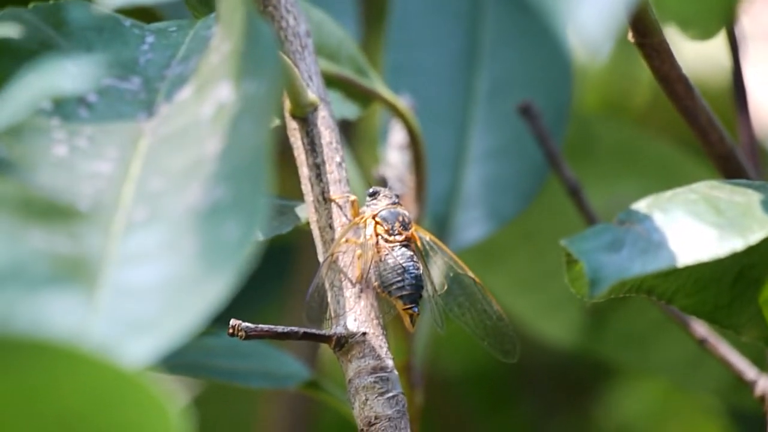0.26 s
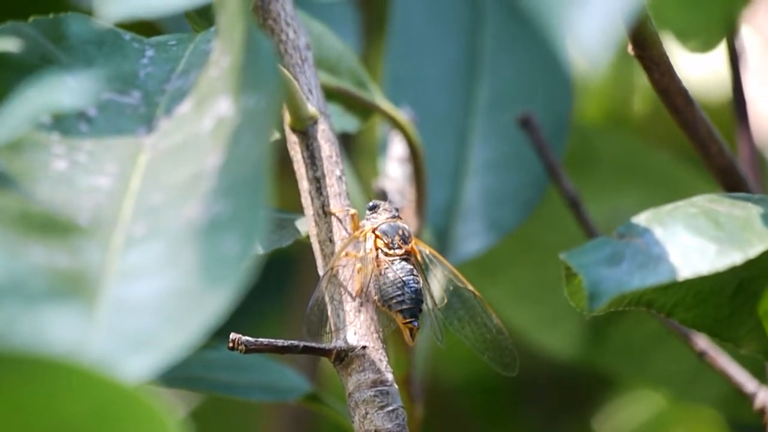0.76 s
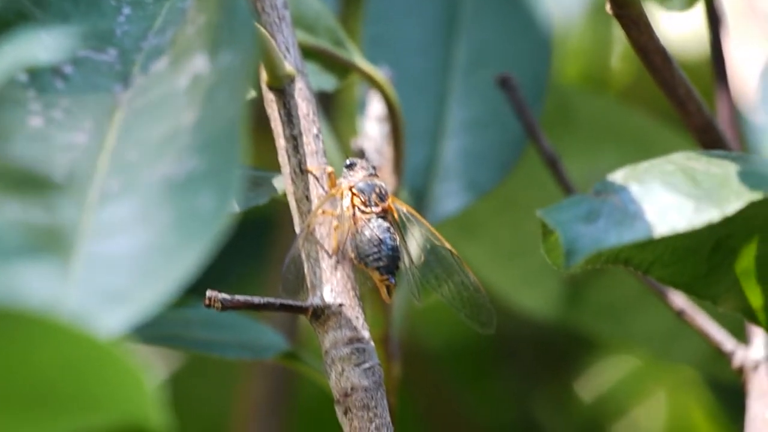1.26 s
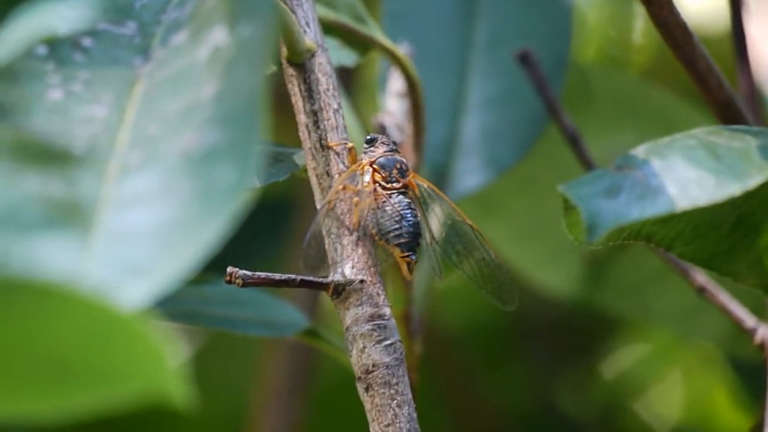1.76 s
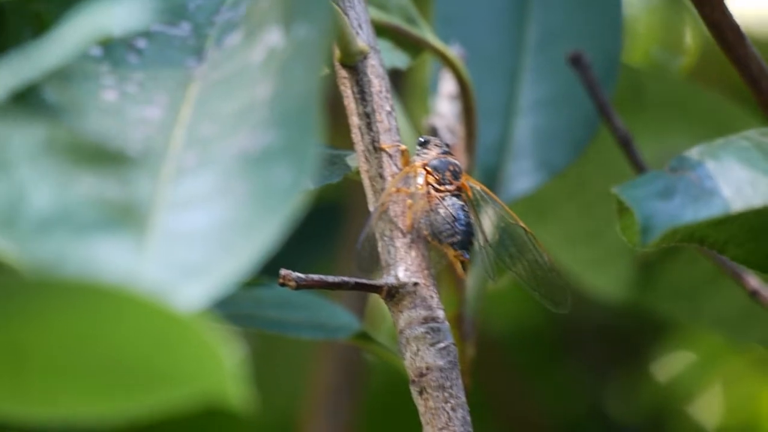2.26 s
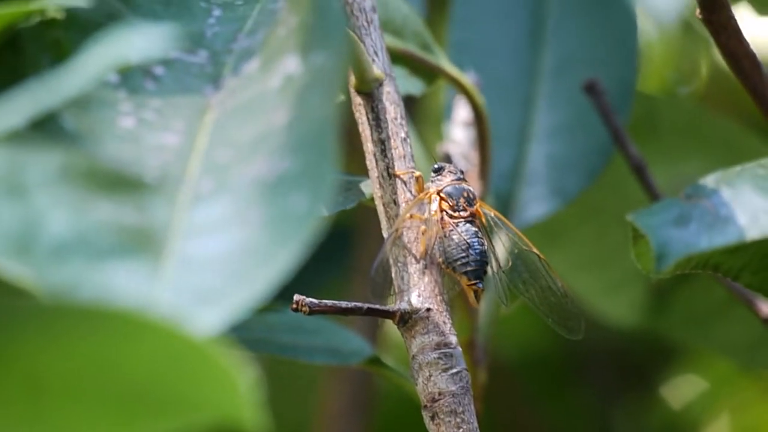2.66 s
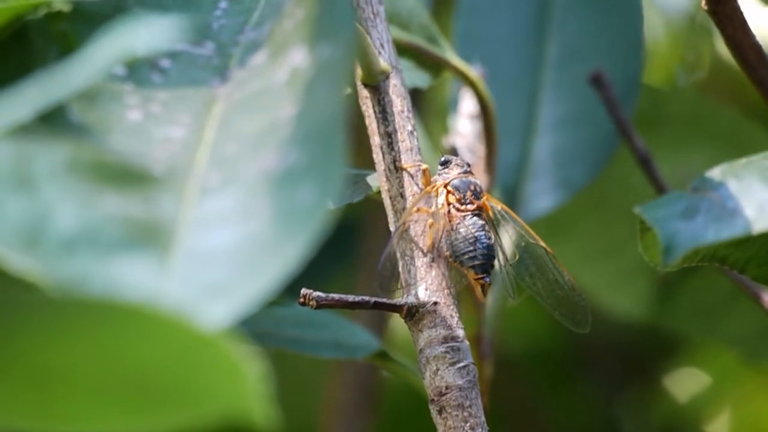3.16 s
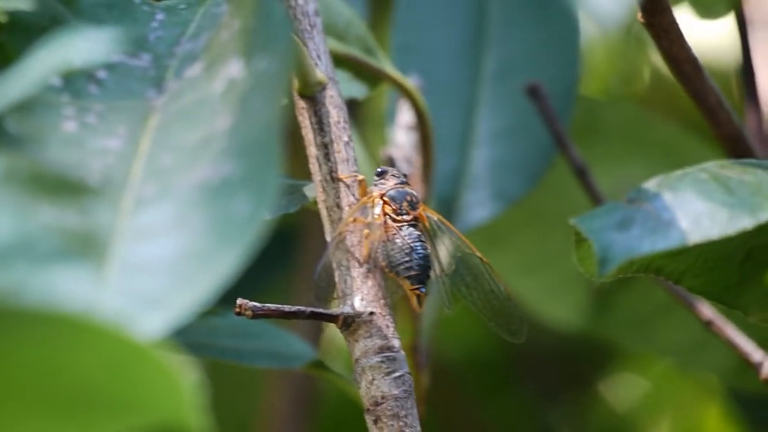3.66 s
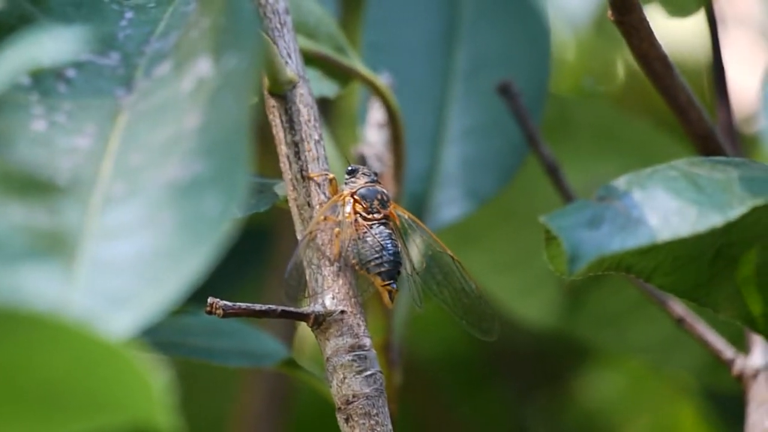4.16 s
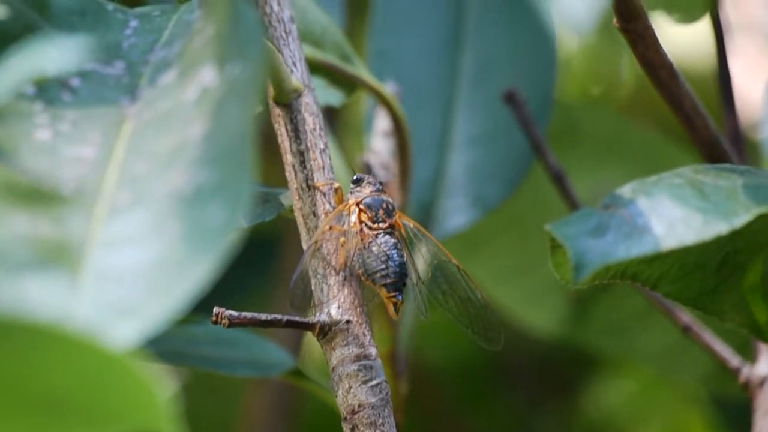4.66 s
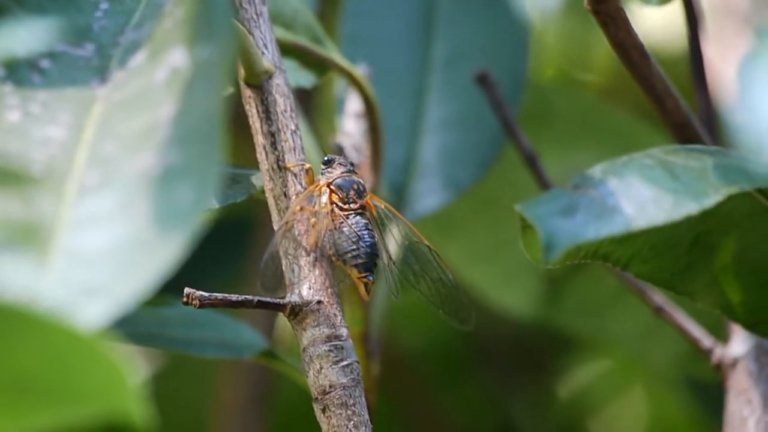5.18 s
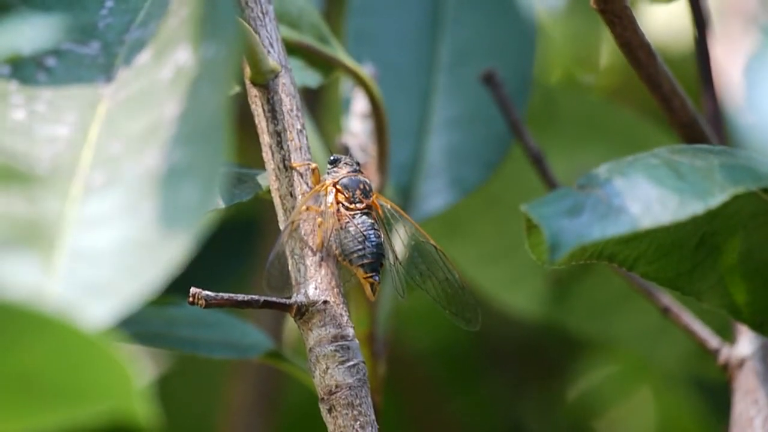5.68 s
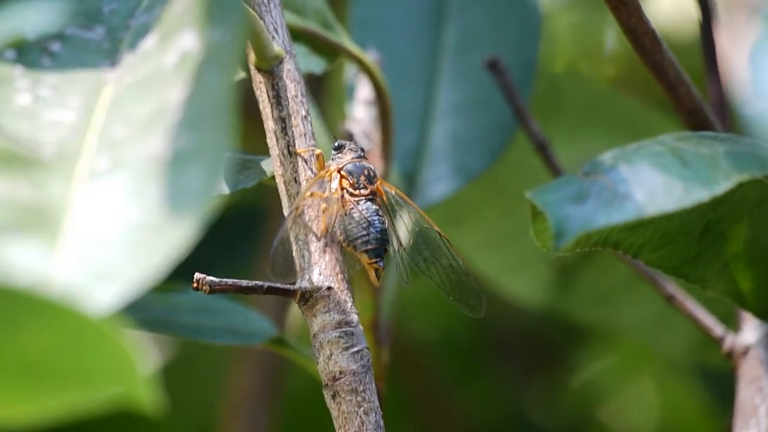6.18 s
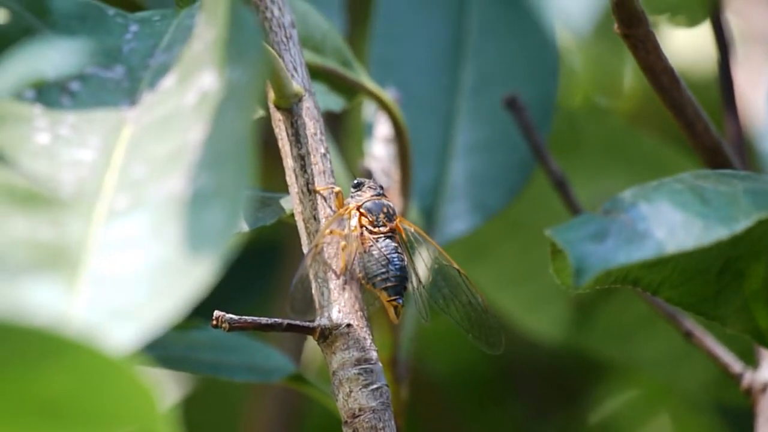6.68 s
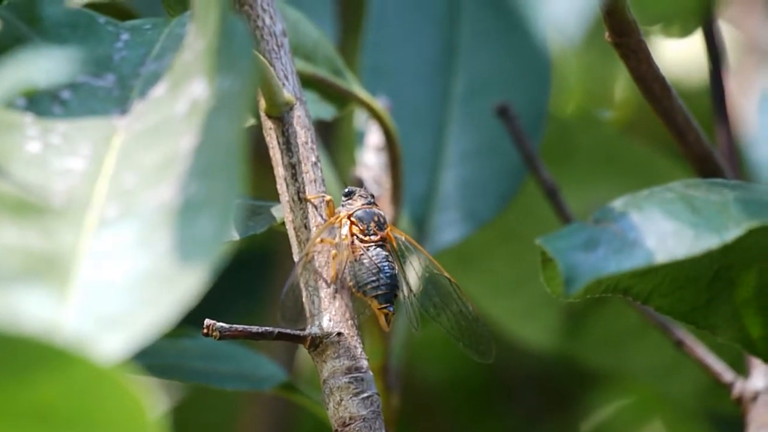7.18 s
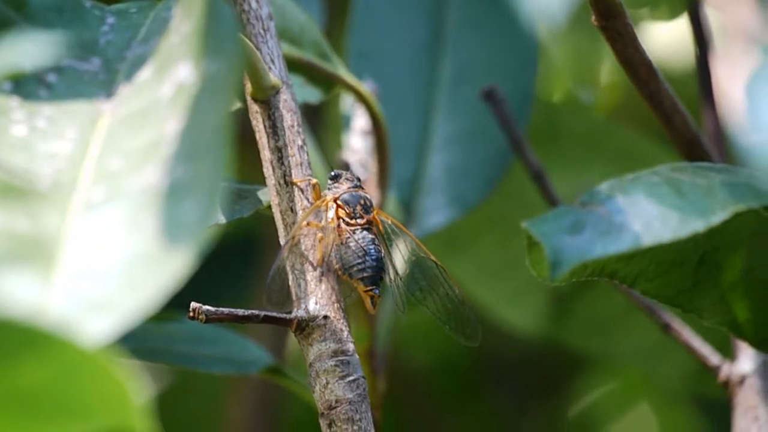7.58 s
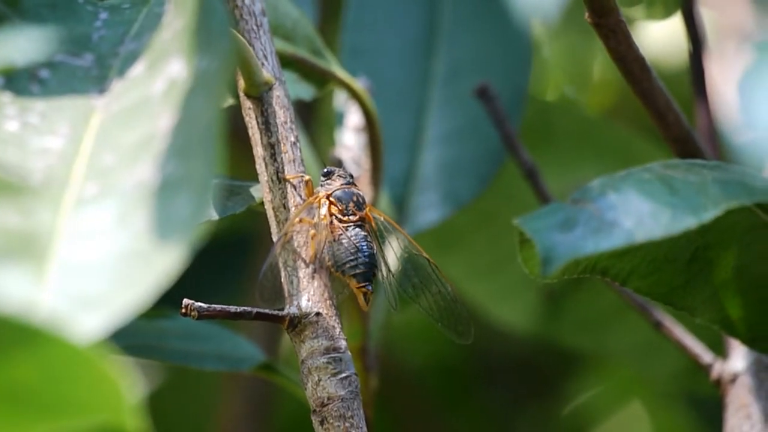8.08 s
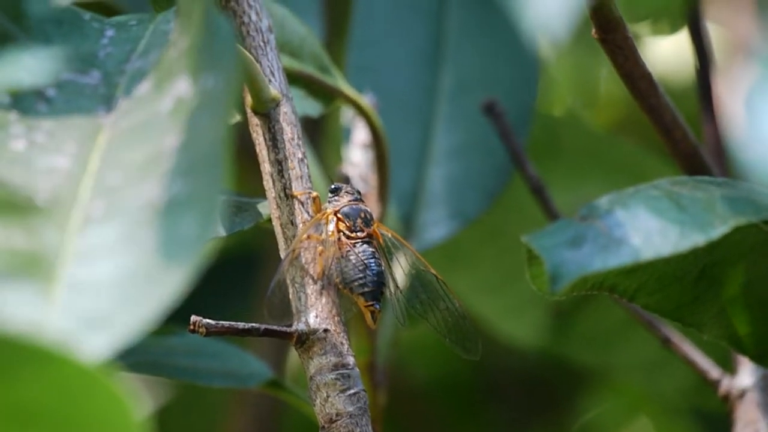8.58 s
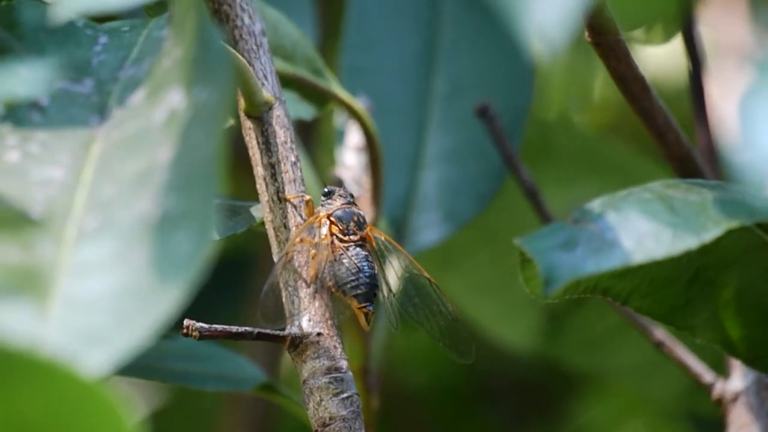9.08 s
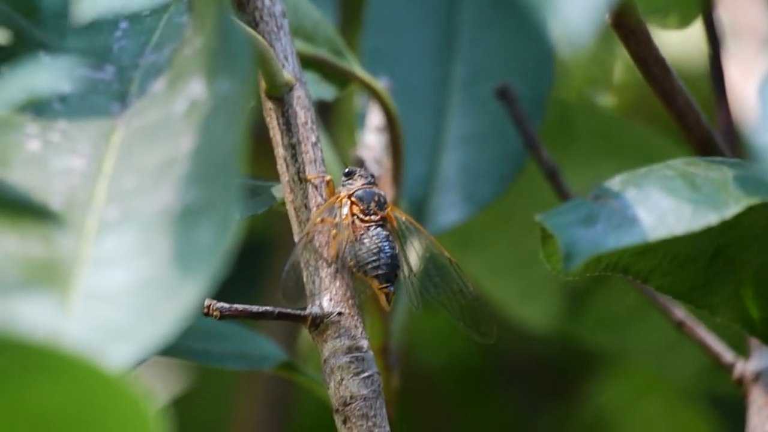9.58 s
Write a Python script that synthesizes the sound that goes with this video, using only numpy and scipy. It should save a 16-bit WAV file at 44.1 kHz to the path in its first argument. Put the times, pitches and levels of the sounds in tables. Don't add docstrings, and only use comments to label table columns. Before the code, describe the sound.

Unbroken piercing cicada buzz from a leafy twig, fine-grained and steady, with soft far-off traffic behind and two small dry ticks.

```python
import sys
import numpy as np
from scipy import signal
from scipy.fft import rfft, irfft, next_fast_len
from scipy.io import wavfile
from scipy.ndimage import map_coordinates

SR = 44100
rng = np.random.default_rng(int(sys.argv[2]) if len(sys.argv) > 2 else 0)


def volts(x):
    e = np.asarray(x, float) / 20
    return 10 ** e


def digitize_waveform(pressure):
    field = np.atleast_2d(pressure).T
    bounded = np.clip(field, -1, 1)
    quanta = np.round(bounded * 32767).astype(np.int16)
    wavfile.write(sys.argv[1], SR, quanta)


N = 433944

# time_s, contractions_per_s
MUSCLE_BEAT = [(0, 144.7), (.3, 144.82), (.6, 144.56), (1.3, 144.57), (1.72, 144.3), (1.97, 144.66),
               (2.36, 144.18), (3.0, 144.33), (3.38, 144.66), (3.7, 144.28), (4.0, 144.3), (4.24, 144.02),
               (5.3, 144.22), (6.4, 144.08), (7.42, 144.18), (7.7, 143.88), (7.92, 144.33), (9.84, 144.0)]
# time_s, level_db
SONG_EFFORT = [(0, -23.5), (1.0, -24.5), (2.2, -24), (3.0, -23.5), (4.1, -24), (5.5, -24), (7.0, -23.5),
               (8.85, -24.5), (9.3, -25), (9.84, -24.5)]
# place_cycles within the contraction, click_db, ring_hz
CROUCHED_RIBS = [(0.111, -4.8, 13150.0), (0.2227, -5.9, 12650.0), (0.2977, 0.5, 10150.0),
                 (0.4082, 0.6, 9470.0), (0.5082, 2.3, 9960.0), (0.662, 4.0, 9980.0),
                 (0.7149, -3.6, 10460.0), (0.8015, 1.9, 10050.0), (0.8491, -5.6, 13500.0),
                 (1.0123, -3.1, 10340.0), (1.1146, -4.8, 7000.0), (1.2002, 1.7, 7750.0),
                 (1.3249, -9.0, 10280.0)]
SETTLED_RIBS = [(0.1483, -3.5, 9530.0), (0.2525, -6.5, 12640.0), (0.3831, 2.5, 7000.0),
                (0.4414, 2.5, 10230.0), (0.5702, 2.8, 9830.0), (0.6215, -2.5, 8800.0),
                (0.6966, 2.5, 9950.0), (0.7901, -2.1, 10250.0), (0.9463, -4.7, 9930.0),
                (1.062, 2.2, 12080.0), (1.0792, 1.9, 11700.0), (1.2027, -8.3, 9760.0),
                (1.314, -2.3, 9050.0)]
RAISED_RIBS = [(0.1883, -3.0, 10870.0), (0.2962, -4.7, 8890.0), (0.3679, -0.3, 10030.0),
               (0.4232, -5.5, 11840.0), (0.4392, -1.9, 7790.0), (0.5056, 1.7, 9190.0),
               (0.6635, 1.0, 10420.0), (0.7626, -4.6, 9790.0), (0.9438, -6.7, 10990.0),
               (1.0084, -3.9, 8620.0), (1.0678, -4.2, 10270.0), (1.2406, -3.1, 10050.0),
               (1.2937, -4.4, 12820.0)]
POSTURE_DB = [-0.5, -0.5, 0.53]
# time_s, spread_s
POSTURE_SHIFTS = [
    (2.25, .03),
    (4.17, .02),
]
# time_s, stroke_scatter_us, long_short_alternation_us, rib_looseness_times
UNSTEADINESS = [(0, 12, 2, 2.0), (2.2, 12, 2, 1.8), (2.4, 10, 1.5, 1.25), (4, 10, 2, 1.35),
                (4.5, 10, 4, 1.6), (9.84, 12, 3.5, 1.8)]
# time_s, half_length_s, scatter_us
STUMBLES = [
    (.35, .03, 2),
    (2.27, 0.05, 10),
    (4.19, .04, 3),
    (5.9, .04, 4),
    (8.1, 0.036, 3),
    (9.0, .03, 5),
    (9.37, .05, 7),
]
RIB_CREEP = (24, 2.5)
# freq_hz, gain_db
ABDOMEN = [(4000, -50), (6500, -41), (7500, -17.5), (8500, -9), (9300, -4), (10250, 1.5), (11200, -3.5),
           (12000, -8), (13000, -21), (14000, -29), (16000, -36)]
# freq_hz, width_hz, depth_0_to_1
LEAF_DIPS = [(9780, 60, 0.6), (10165, 25, .5), (10590, 55, 0.65), (11330, 60, 0.6), (11660, 90, .45),
             (12240, 200, 0.3)]
# freq_hz, level_db_per_hz
WING_RASP = [(11500, -40), (12500, 9), (13500, -3), (14400, -10), (15000, -6), (15250, -16), (16000, -18)]
# multiple_of_beat, level_db
THORAX = [(30, -76), (31, -79), (32, -71), (33, -71), (40, -76), (43, -77), (44, -72), (48, -76)]
# time_s, level_db
TRAFFIC = [(0, -2), (3.9, 0.5), (4.9, -0.5), (6.0, 1.5), (8.3, 1.5), (9.84, 0)]
# freq_hz, level_db_per_hz
RUMBLE = [(15, 0), (40, -3.5), (120, -0.5), (250, -1), (400, -4.5), (700, -29.5)]
RUSH = [(200, -55), (400, -2), (900, -0.5), (1400, -4.5), (2200, -13), (3500, -19), (5000, -24.5),
        (7000, -18), (12000, -10.5), (15000, -48), (15300, -46)]
# freq_hz, level_db
HUM = [(58.8, -48), (114, -52), (232, -53), (294, -56.5), (412, -56), (470, -58.5), (529, -57.5),
       (588, -62), (882, -63.5), (1163, -58.5)]
# freq_hz, width_hz, level_db
PANELS = [(1990, 200, -61), (2800, 150, -62.5), (3960, 280, -70), (5360, 100, -65)]
# time_s, peak_db
TWIG_TICKS = [
    (0.7683, -23.5),
    (7.5612, -33),
]

RIB_SCATTER_DB, RIB_SCATTER_US, STROKE_SCATTER_DB = .8, 3, .4
STUMBLE_DB_PER_US = -0.12
FLUTTER_DB, FLUTTER_CALMS_S, FLUTTER_PER_S = .6, 2, 40
# (spread s, Hz over which the delay changes)
OPEN_PATH, LEAFY_PATH = (.0009, 300), (.002, 170)
RASP_DB, RASP_SWAY_DB, RASP_DB_PER_US = -50.5, 2, .3
RUMBLE_DB, RUSH_DB, RUSH_SWAY_DB = -40.5, -39, .3
RUSH_FOLLOWS = 0.27
MOTOR_HZ = 58.98
RATTLE_SWAY_DB, RATTLE_PER_S = 1.5, 7
EDGE_HZ = 15150


def unit(x):
    return x / np.sqrt(np.mean(x ** 2) + 1e-20)


def along(points, hz):
    f, v = np.transpose(points)
    return np.interp(np.log(hz + 1), np.log(f + 1), v)


def curves(rows, s):
    t, *columns = np.transpose(rows)
    return [np.interp(s, t, column) for column in columns]


def wobble(rate):
    coarse = np.arange(0, N + 32, 32)
    knots = rng.standard_normal(int(N / SR * 80))
    smooth = map_coordinates(knots, [coarse * min(rate, 75) / SR])
    return np.interp(np.arange(N), coarse, smooth)


def filtered(x, response):
    m = next_fast_len(N + SR // 2)
    return irfft(rfft(x, m) * response(np.fft.rfftfreq(m, 1 / SR)), m)[..., :N]


def noise(spectrum):
    return unit(filtered(rng.standard_normal(N), lambda hz: volts(along(spectrum, hz))))


def placed(taps, grains):
    index = np.where(taps < 0, N, np.minimum(taps, N)).astype(int)
    return np.bincount(index.ravel(), grains.ravel(), N + 1)[:N]


def clicks(s, size):
    at = s.ravel()[:, None] * SR
    taps = np.floor(at) + np.arange(-15, 17)
    shape = np.sinc(taps - at) * np.cos(np.pi * (taps - at) / 32) ** 2
    index = np.clip(taps, 0, N).astype(int)
    return np.bincount(index.ravel(), (shape * size.reshape(-1, 1)).ravel(), N + 1)[:N]


def rings(s, db, hz, life):
    taps = np.ceil(s.ravel()[:, None] * SR) + np.arange(54)
    age = taps / SR - s.reshape(-1, 1)
    swell = volts(db).reshape(-1, 1) * age * np.exp(-age / life)
    return placed(taps, swell * np.cos(2 * np.pi * hz.reshape(-1, 1) * age))


def stumbling(s):
    return sum(us * np.exp(-((s - at) / half) ** 2) for at, half, us in STUMBLES)


def rib_clicks(t, beat, turns):
    ahead = np.r_[turns, turns[-1] + 3]
    start = np.interp(np.arange(int(turns[-1]) + 3), ahead, np.r_[t, t[-1] + 3 / beat[-1]])
    ribs = np.arange(len(CROUCHED_RIBS))
    turn_order = rng.uniform(-1, 1, len(ribs))
    posture = sum(start[:, None] > s + spread * turn_order for s, spread in POSTURE_SHIFTS)
    postures = np.array([CROUCHED_RIBS, SETTLED_RIBS, RAISED_RIBS])
    place, db, hz = np.moveaxis(postures[posture, ribs], -1, 0)

    knots = rng.standard_normal((2, 250, len(ribs)))
    creep_time, creep_strength = [map_coordinates(k, np.meshgrid(start * rate, ribs, indexing="ij"))
                                  for k, rate in zip(knots, RIB_CREEP)]
    limp = np.cos(np.pi * np.arange(len(start)) + 2.3 * np.interp(start, t, wobble(14)))
    scatter, alternation, loose = curves(UNSTEADINESS, start)
    limping_db = 1.5 * (loose * limp)[:, None] * np.cos(2.05 * place * np.pi)
    loose = loose[:, None]
    stumble = stumbling(start)[:, None]
    stroke_luck, rib_luck, strength_luck = rng.standard_normal((3, *place.shape))

    stroke_us = (scatter * stroke_luck[:, 0] + alternation * limp)[:, None]
    rib_us = (RIB_SCATTER_US * loose + stumble) * rib_luck + 3.6 * loose * creep_time
    when = start[:, None] + (place - .5) / np.interp(start, t, beat)[:, None]
    when = when + 1e-6 * (stroke_us + rib_us)

    size_db = db + np.take(POSTURE_DB, posture) + limping_db + STUMBLE_DB_PER_US * stumble
    size_db = size_db + RIB_SCATTER_DB * loose * strength_luck + 0.94 * creep_strength
    size_db = size_db + STROKE_SCATTER_DB * stroke_luck[:, 1:2]
    return rings(when, size_db, hz + 15 * stumble, life=.00012)


def leaves(spread, grain_hz):
    hz = np.arange(0, SR / 2 + 20, 10)
    delay = spread * map_coordinates(rng.standard_normal(150), [hz / grain_hz])
    phase = 2 * np.pi * 10 * np.cumsum(delay)
    dips = np.ones(len(hz))
    for center, wide, depth in LEAF_DIPS:
        dips = dips * (1 - np.clip(depth, 0, 1) * np.exp(-((hz - center) / wide) ** 2))
    return lambda f: volts(along(ABDOMEN, f)) * np.interp(f, hz, dips) * np.exp(-1j * np.interp(f, hz, phase))


def wing_rasp(t):
    rasp_db = RASP_DB + RASP_SWAY_DB * wobble(7.4) + RASP_DB_PER_US * stumbling(t)
    return volts(rasp_db + 1.2 * wobble(60)) * noise(WING_RASP)


def thorax(turns):
    return sum(volts(db + 3.5 * wobble(3)) * np.sin(2 * np.pi * multiple * turns + 0.59 * wobble(40))
               for multiple, db in THORAX)


def cicada():
    t = np.arange(N) / SR
    beat = curves(MUSCLE_BEAT, t)[0] + 0.1145 * wobble(14)
    turns = np.cumsum(beat) / SR
    train = rib_clicks(t, beat, turns)
    reared = t > POSTURE_SHIFTS[-1][0]
    before = filtered(train * ~reared, leaves(*OPEN_PATH))
    after = filtered(train * reared, leaves(*LEAFY_PATH))
    flutter_db = FLUTTER_DB * (.5 + np.exp(-t / FLUTTER_CALMS_S)) * wobble(FLUTTER_PER_S)
    song_db = curves(SONG_EFFORT, t)[0] + flutter_db
    return volts(song_db) * unit(before + after) + wing_rasp(t) + thorax(turns)


def traffic():
    near_db = curves(TRAFFIC, np.arange(N) / SR)[0]
    rumble_db = RUMBLE_DB + near_db + 0.9 * wobble(3.06)
    rush_db = RUSH_DB + RUSH_FOLLOWS * near_db + RUSH_SWAY_DB * wobble(1.69)
    return volts(rumble_db) * noise(RUMBLE) + volts(rush_db) * noise(RUSH)


def cooling_hum():
    t = np.arange(N) / SR
    return sum(volts(db + 3 + 2.4 * wobble(5)) * np.sin(2 * np.pi * hz * t + 0.85 * wobble(3)) for hz, db in HUM)


def casing_rattle():
    taps = np.arange(int(N / SR * MOTOR_HZ)) / MOTOR_HZ
    tapping = unit(clicks(taps, volts(2 * rng.standard_normal(len(taps)))))
    drive = tapping + 1.15 * rng.standard_normal(N)

    def panel(hz, wide):
        return unit(filtered(drive, lambda f: np.exp(-((f - hz) / wide) ** 2)))

    return sum(volts(db + RATTLE_SWAY_DB * wobble(RATTLE_PER_S)) * panel(hz, wide) for hz, wide, db in PANELS)


def twig():
    s, db = np.transpose(TWIG_TICKS)

    def wood(f):
        damping = 1j * f * 1300
        return (damping / (3400 ** 2 - f * f + damping)) ** 2

    return filtered(clicks(s, volts(db + 15)), wood)


def scene():
    mono = cicada() + traffic() + cooling_hum() + casing_rattle() + twig()
    return np.tile(mono, (2, 1))


def top_cut(x):
    return signal.sosfilt(signal.butter(12, 15650, fs=SR, output="sos"), x)


def record(dry):
    t = np.arange(N) / SR
    left = filtered(dry[0], lambda hz: (0.15 + 1j * hz / 155) / (1 + 1j * hz / 155))
    top = filtered(dry[1], lambda hz: hz > EDGE_HZ)
    passing = np.clip(3 * (wobble(30) - 2.1 + .17 * t + .22 * stumbling(t)), 0, 1)
    mix = np.array([left, dry[1]]) - (1 - passing) * top
    return top_cut(mix)


dry = scene()
out = record(dry)
digitize_waveform(out)
```